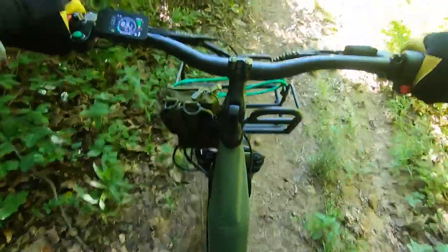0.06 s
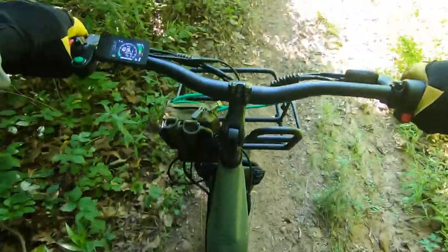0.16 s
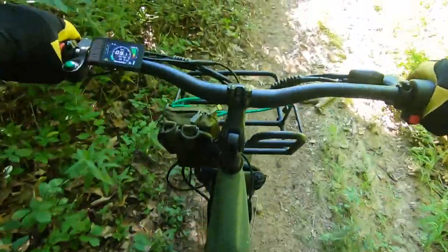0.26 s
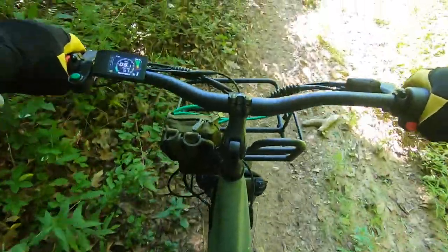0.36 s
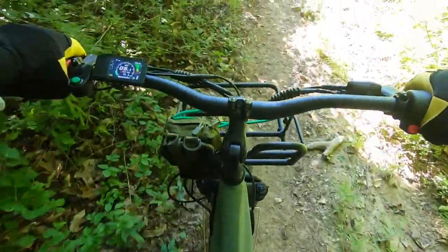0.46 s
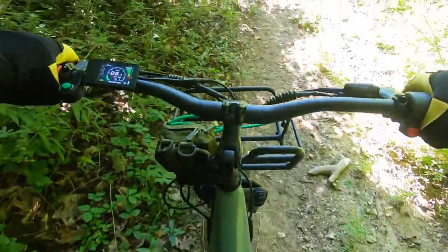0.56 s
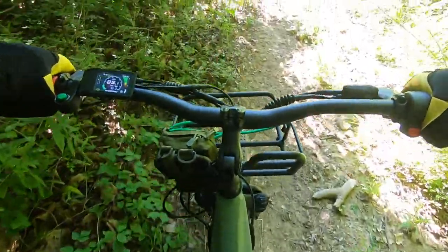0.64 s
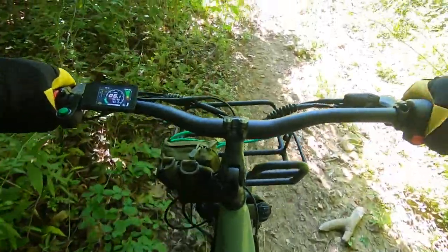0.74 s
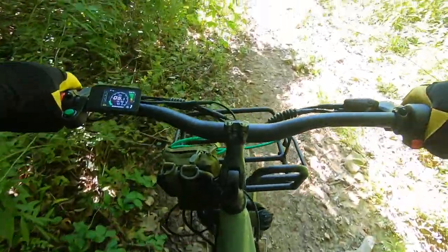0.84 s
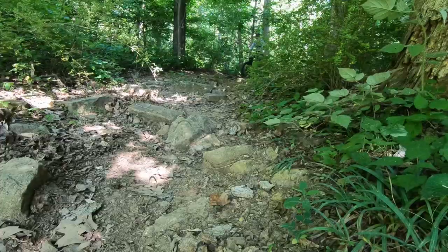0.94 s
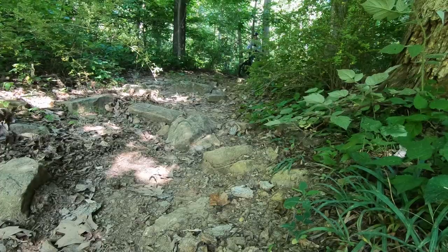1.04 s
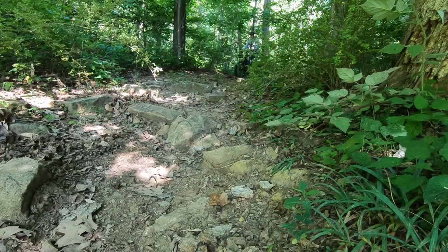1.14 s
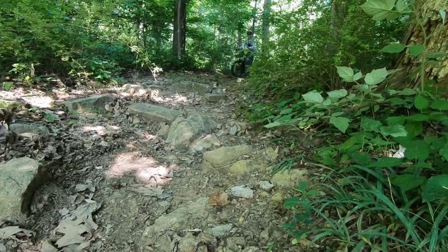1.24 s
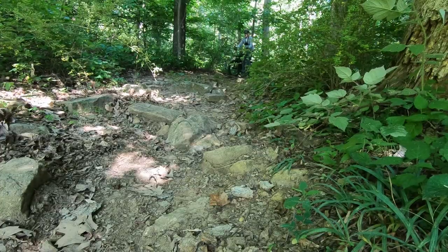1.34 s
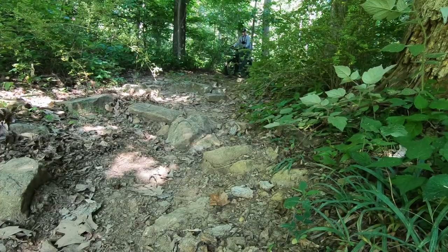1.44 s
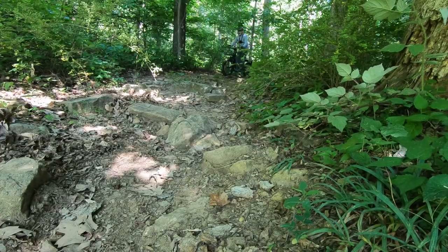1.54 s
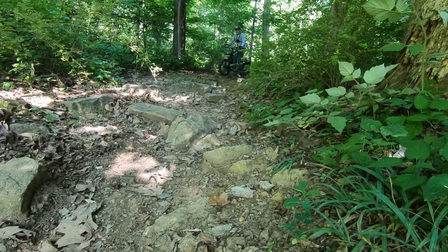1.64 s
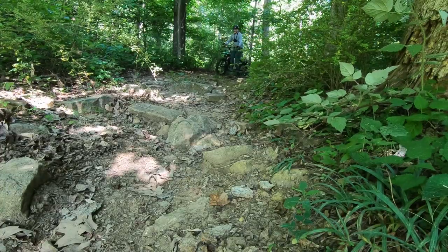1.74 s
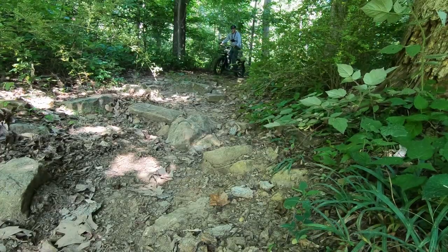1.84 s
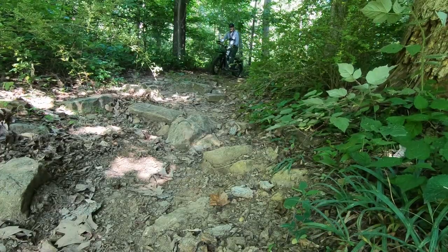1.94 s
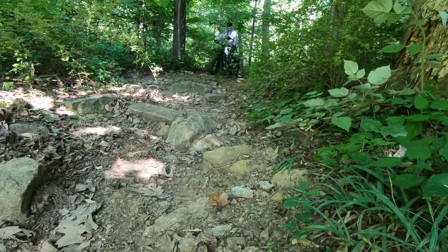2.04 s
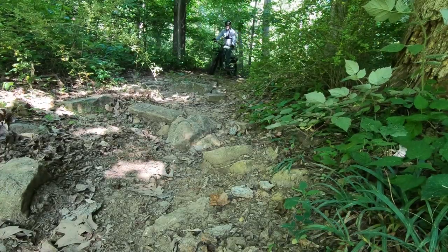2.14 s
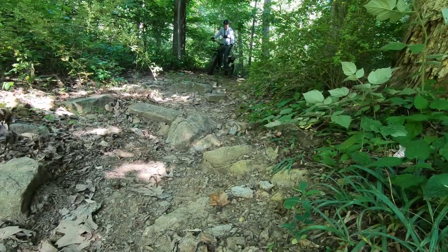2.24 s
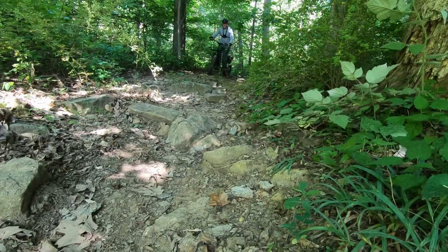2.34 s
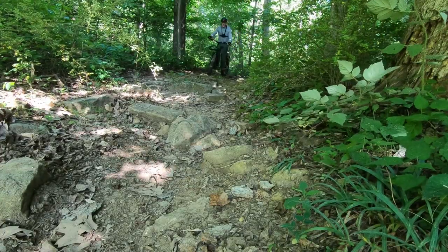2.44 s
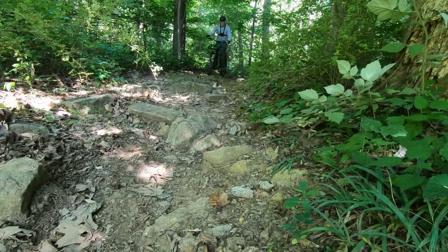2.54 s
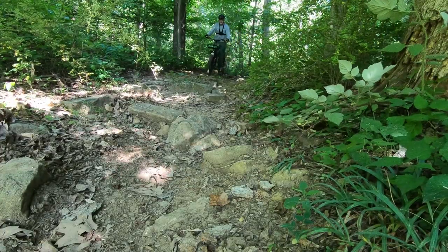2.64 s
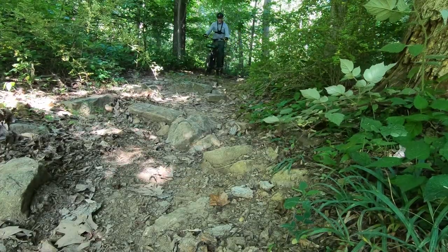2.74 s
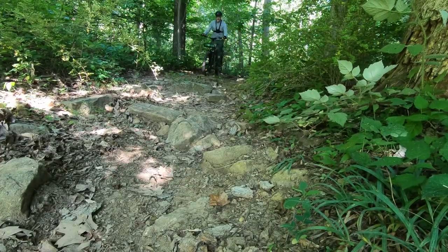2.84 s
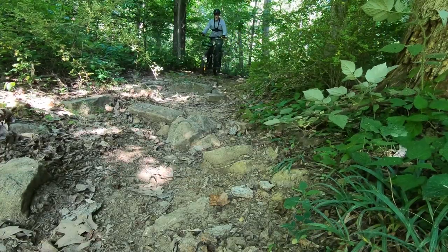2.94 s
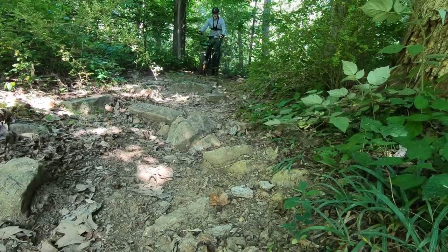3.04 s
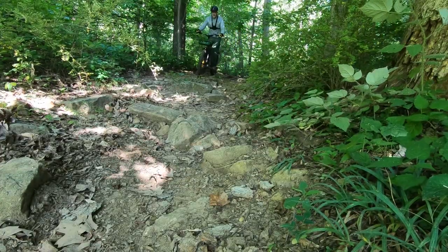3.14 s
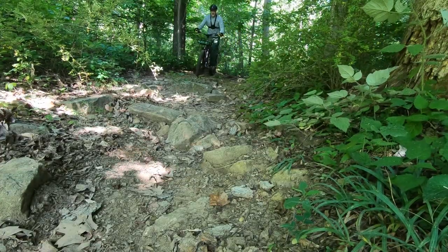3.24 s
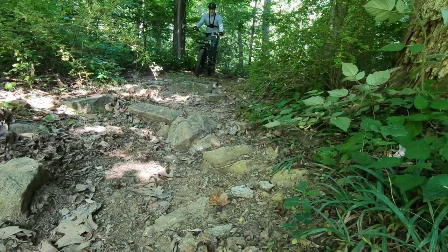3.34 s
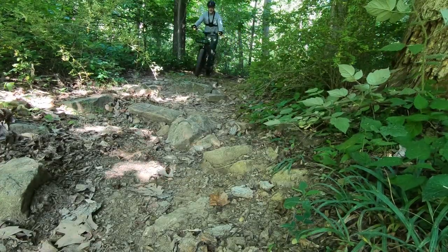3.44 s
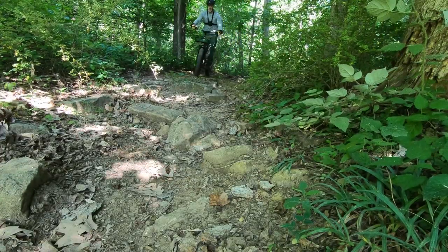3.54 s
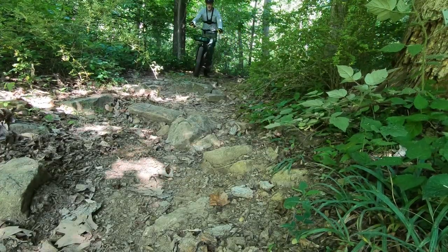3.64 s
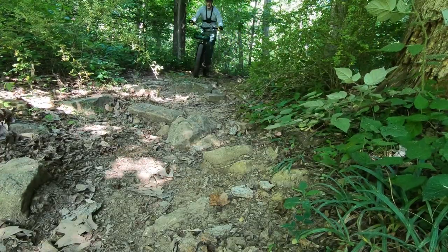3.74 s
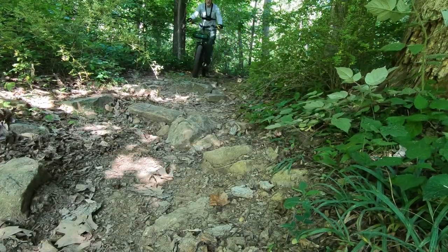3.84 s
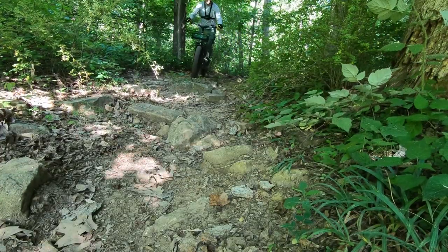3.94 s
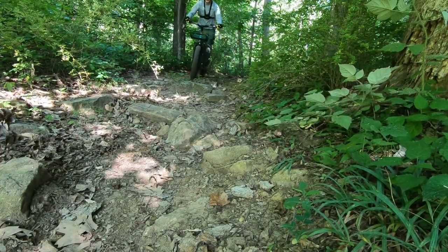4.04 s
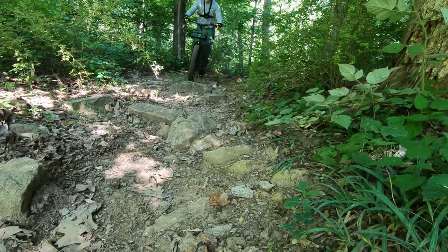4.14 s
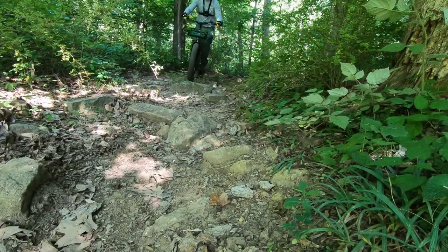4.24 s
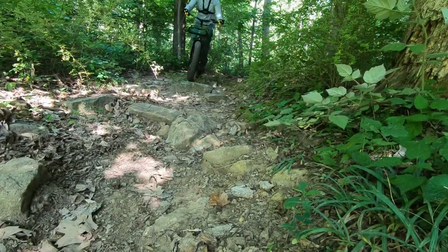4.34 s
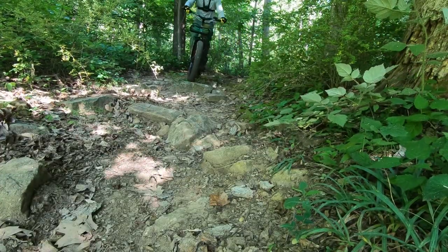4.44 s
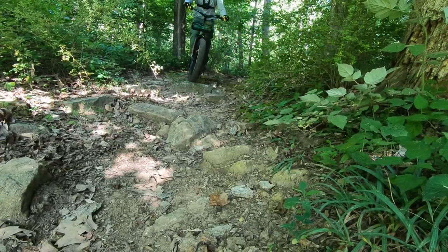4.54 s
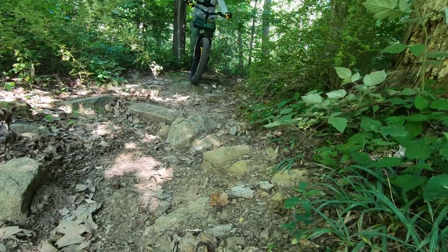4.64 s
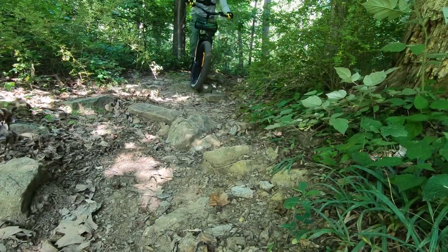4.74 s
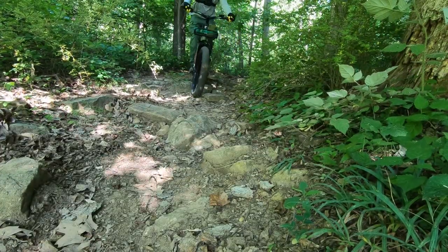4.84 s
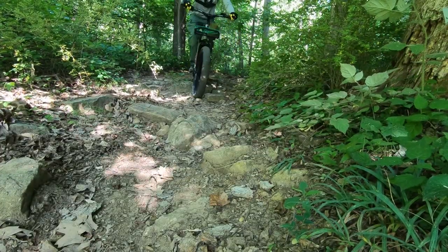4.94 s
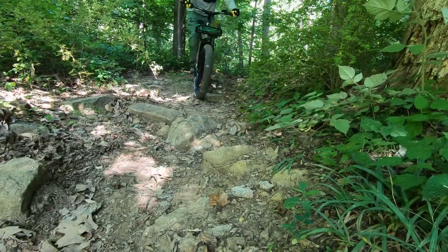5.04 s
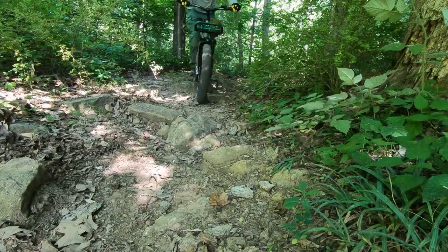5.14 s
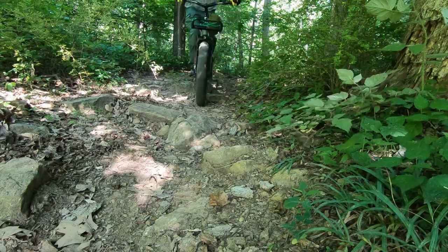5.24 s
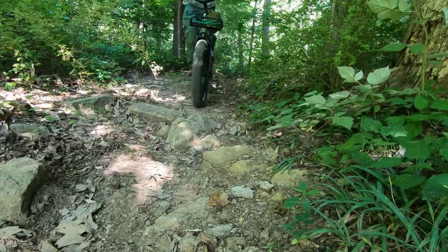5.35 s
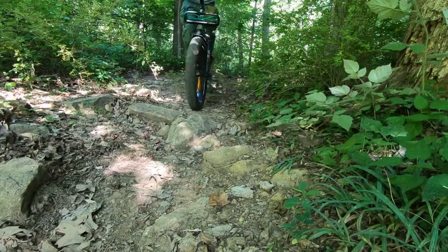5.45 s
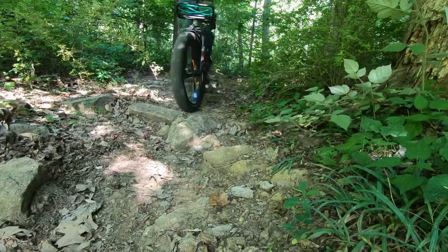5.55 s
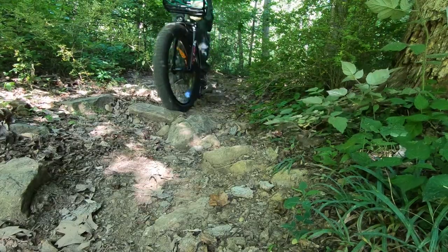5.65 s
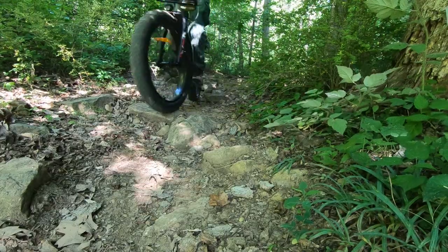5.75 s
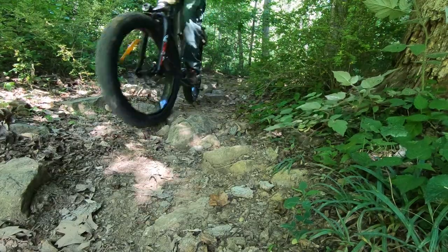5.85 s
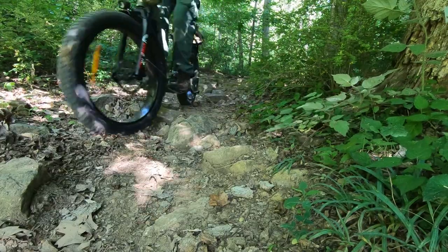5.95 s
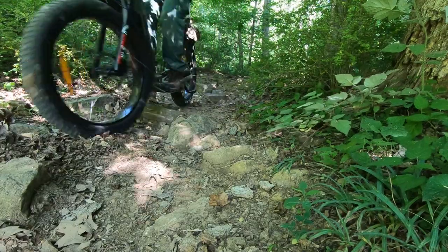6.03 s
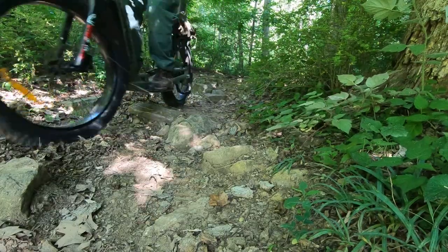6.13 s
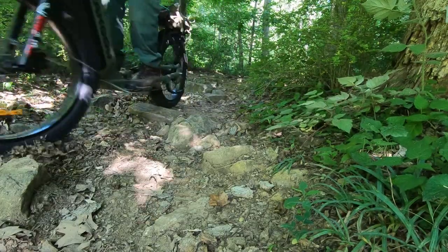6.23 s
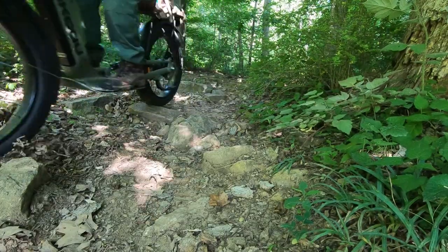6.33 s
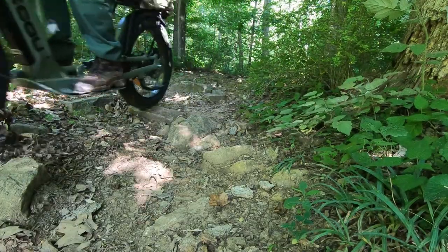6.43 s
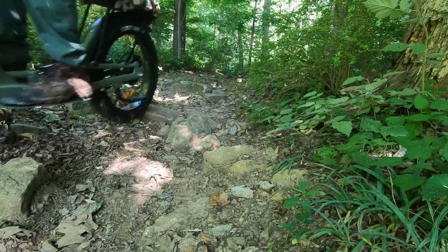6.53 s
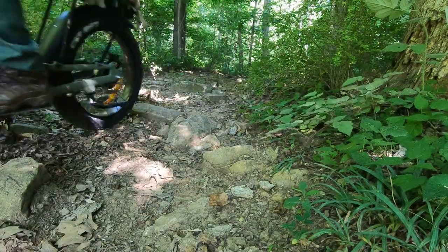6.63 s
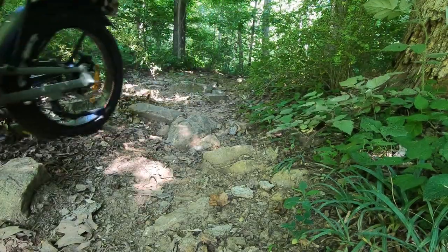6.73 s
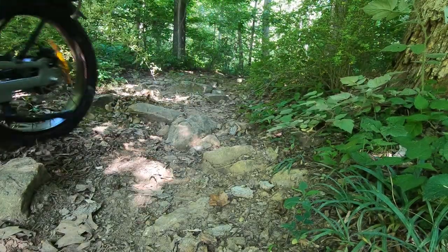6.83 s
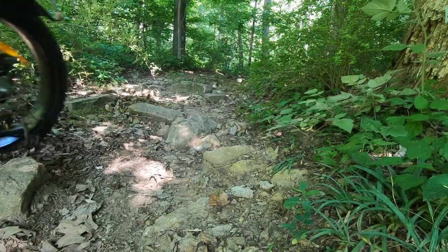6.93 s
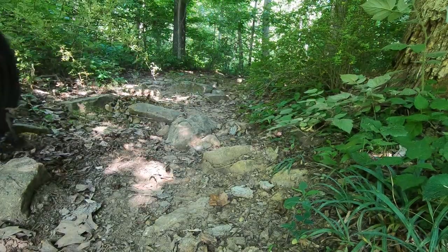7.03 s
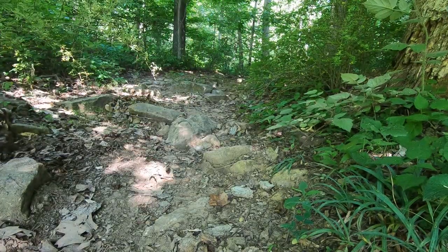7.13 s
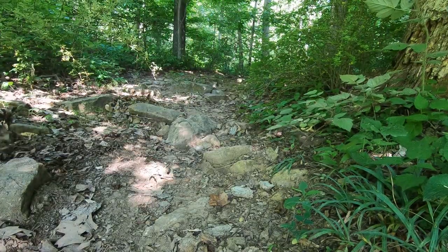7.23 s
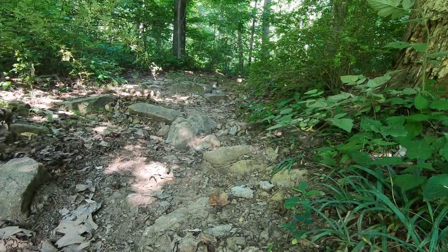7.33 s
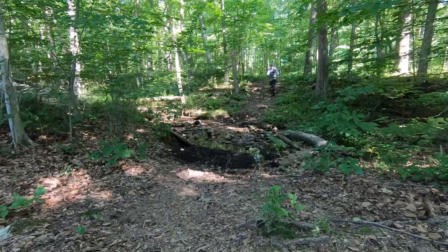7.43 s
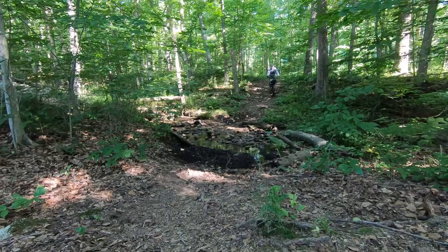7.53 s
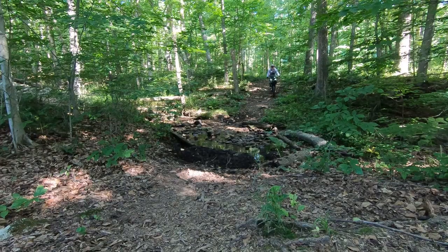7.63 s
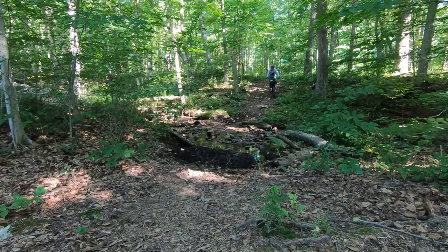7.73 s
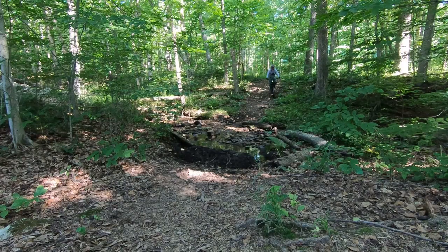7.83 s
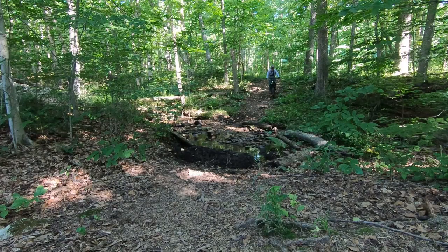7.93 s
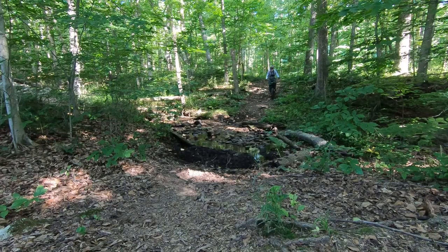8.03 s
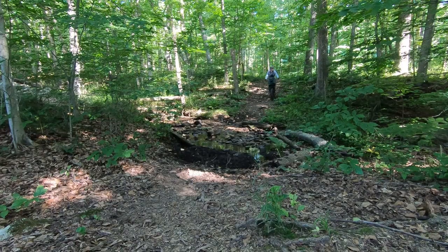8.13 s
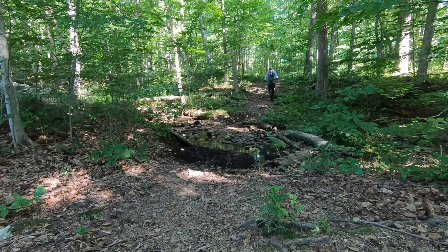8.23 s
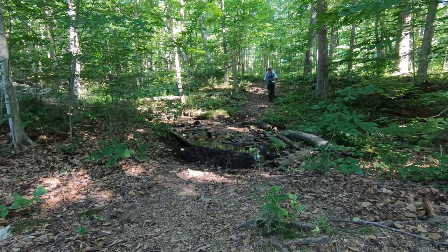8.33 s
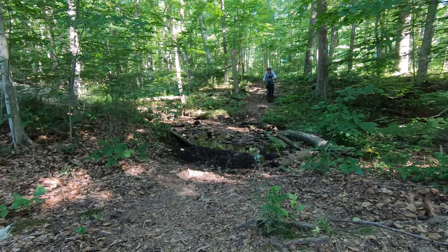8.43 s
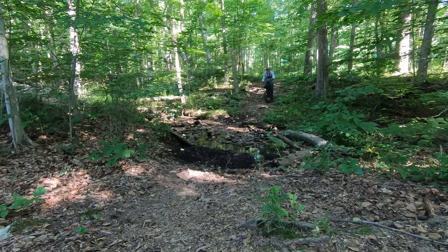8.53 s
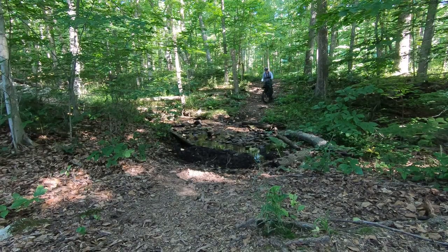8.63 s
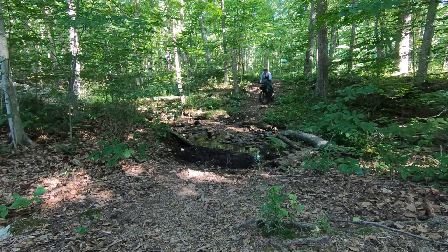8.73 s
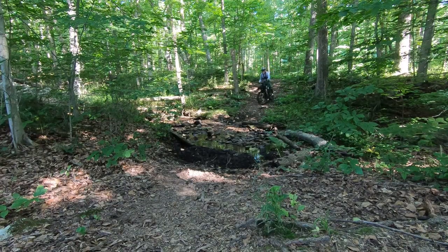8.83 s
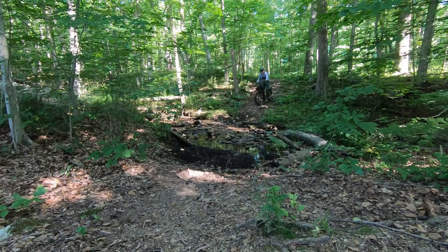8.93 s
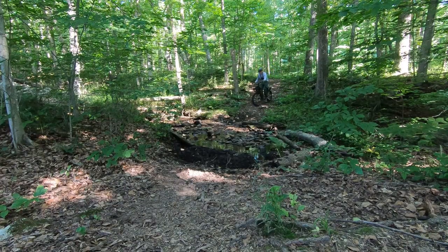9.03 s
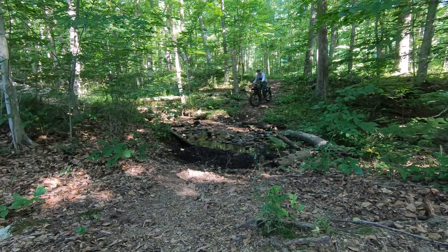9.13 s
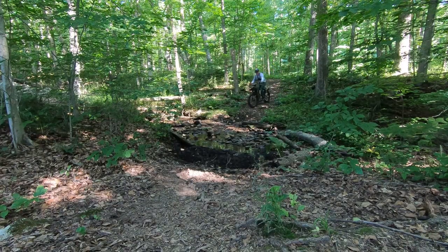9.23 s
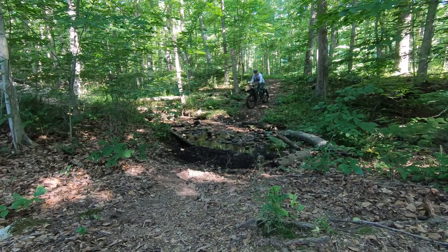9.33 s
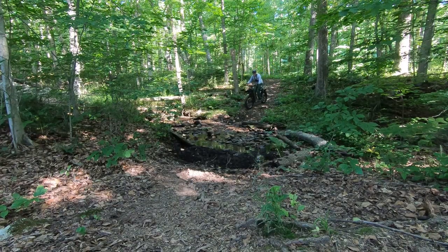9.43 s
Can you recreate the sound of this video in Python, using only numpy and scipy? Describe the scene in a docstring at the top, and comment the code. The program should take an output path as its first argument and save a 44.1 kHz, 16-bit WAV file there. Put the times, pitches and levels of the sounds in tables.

```python
"""A fat-tyred electric scooter on a woodland trail, heard from three places in turn.
First on board: frame and gear rattle as dense random contacts, with wind on the microphone ports.
Then from the ground: it nears over rocks, sticks and leaves, made of ringing grains, knocks and ticks.
Last from far off: smeared stones and rustles in the quiet wood, which is coloured noise."""
import sys
import numpy as np
from scipy import signal
from scipy.fft import rfft, irfft
from scipy.io import wavfile

SR = 44100
rng = np.random.default_rng(int(sys.argv[2]) if len(sys.argv) > 2 else 0)


def inscribe(sig):
    """Save sig as 16-bit PCM at rate SR to the path in sys.argv[1].

    A 1-D sig is mono; a 2-D sig holds one channel per row.
    Samples are clipped to [-1, 1] before scaling.
    """
    pcm = np.round(np.clip(np.atleast_2d(sig).T, -1, 1) * 32767)
    wavfile.write(sys.argv[1], SR, pcm.astype(np.int16))


N = 418068
TIME = np.arange(N) / SR   # seconds
HZ = np.maximum(np.arange(N // 2 + 1) * SR / N, 1)   # frequencies of the spectrum

ON_BOARD_END_S, PASS_END_S = .915, 7.457   # the listening place changes at these moments

# How the two microphone ports hear the wheels and knocks. Each row: frequency in Hz, likeness of the
# ports from 0 to 1, lead of the left port in radians, left level over right in dB.
PORTS_NEAR = [(308, 0.98, 0.046, -3.5), (570, 0.53, 0.81, -4.5), (1000, 0.49, 1.67, 2.5),
              (1960, 0.4, 0.084, 3.5), (3900, 0.5, 0.65, 0), (5770, 0.75, 1.3, 1), (9000, 0.57, 2.7, -0.5)]


def from_db(db):
    """Turn decibels into a plain factor."""
    return 10 ** (np.asarray(db) / 20)


def rms_one(x):
    """Scale to an average strength (rms) of 1."""
    return x / np.sqrt(np.mean(x ** 2) + 1e-20)


def in_time(rows):
    """Draw straight lines between rows that start with a time."""
    s, *columns = np.transpose(rows)
    return [np.interp(TIME, s, c) for c in columns]


def in_hz(rows):
    """Draw lines between rows that start with a frequency, on a log pitch scale."""
    hz, *columns = np.transpose(rows)
    return [np.interp(np.log(HZ), np.log(hz), c) for c in columns]


def colour(x, spectrum):
    """Weight the frequencies by a table; rms 1."""
    return rms_one(irfft(rfft(x) * from_db(in_hz(spectrum)[0]), N))


def drift(rate_hz):
    """Slow random wandering around 0, with a spread of 1."""
    return rms_one(irfft(rfft(rng.standard_normal(N)) / (1 + (HZ / rate_hz) ** 2), N))


def low_pass(x, order, hz):
    """Keep what lies below hz."""
    return signal.sosfilt(signal.butter(order, hz, fs=SR, output="sos"), x)


def resonance(x, hz, width_hz):
    """Let a sound excite one ringing pitch; the narrower its band, the longer it rings."""
    r = np.exp(-np.pi * width_hz / SR)
    feedback = [1, -2 * r * np.cos(2 * np.pi * hz / SR), r * r]
    return signal.lfilter([1 - r * r, 0, r * r - 1], feedback, x) / 2


def burst(s, length, swell_s=0.011):
    """Loudness curve that swells from second s, then falls more and more steeply."""
    fall_power = 1.44
    out, start, fall = np.zeros(N), round(s * SR), max(length, .005)
    u = np.arange(min(N - start, int(10 * fall * SR))) / SR
    out[start:start + len(u)] = (1 - np.exp(-u / swell_s)) * np.exp(-(u / fall) ** fall_power)
    return out


def grains(per_s, uneven_db, low_hz, high_hz, cycles, clump_db):
    """Three streams of clumped random contacts of uneven size, each ringing at one of twelve pitches."""
    sizes = from_db(uneven_db * np.minimum(rng.exponential(1, (3, N)), 4))
    sizes = sizes * rng.choice([-1, 1], (3, N))
    chance = per_s * from_db(clump_db * drift(25)) / SR
    clicks = sizes * (rng.random((3, N)) < chance)
    dealt = rng.integers(0, 12, N)   # which pitch each moment belongs to
    out = np.zeros((3, N))
    for k, hz in enumerate(np.geomspace(low_hz, high_hz, 12)):
        out += resonance(clicks * (dealt == k) + 1e-18, hz, hz / cycles) / hz
    return rms_one(out)


def ports(three, table):
    """Both ports hear the first signal, one with a lead; each adds scattered sound of its own."""
    alike, lead, balance_db = in_hz(table)
    alike, side, sound = np.clip(alike, 0, 1), np.array([[.5], [-.5]]), rfft(three)
    shared = np.sqrt(alike) * np.exp(1j * side * lead) * sound[0]
    own = np.sqrt(1 - alike) * sound[1:]
    return irfft((shared + own) * from_db(side * balance_db), N)


def scattered(x):
    """Trees smear a sound into a short dying cloud of echoes; its strength stays."""
    cloud = rng.standard_normal(N) * np.exp(-TIME / .03)
    return rms_one(irfft(rfft(x) * rfft(cloud), N)) * np.std(x)


def top_octave_dulled(x):
    """Soften the treble above 8 kHz, except in the bright stretch from 5.85 s to the end of the pass."""
    bright_from_s, kept_share, dull_cut_hz = 5.85, 0.35, 8000
    bright = np.clip((TIME - bright_from_s) / 0.3, 0, 1) * (TIME < PASS_END_S)
    bright = kept_share + (1 - kept_share) * bright
    dull = irfft(rfft(x) / (1 + (HZ / dull_cut_hz) ** 6), N)
    return bright * x + (1 - bright) * dull


def wood():
    """Coloured noise as the hush of the wood, with a low far hum, weaker and wavering at the last place."""
    # Each row: frequency in Hz, relative level in dB.
    hush_colour = [(25, -17), (65, -5.5), (107, -20.5), (144, 0), (202, 2.5), (244, -11), (318, -11.5),
                   (584, -23), (666, -18.5), (1050, -27), (1360, -19.5), (3260, -24), (4600, -28.5),
                   (6000, -20), (7610, -34), (12600, -48), (14000, -69)]
    # Each row: frequency in Hz, likeness of the ports from 0 to 1, lead of the left in radians,
    # left level over right in dB.
    wood_ports = [(312, 0.039, 3, -2.5), (660, 0.057, 8.5, -1.5), (1620, 0.37, 1.5, -1.2),
                  (4800, 0.79, 0, 1), (7700, 0.029, 23.5, 0)]
    level_db = -53.5 + .9 * drift(4)   # the hush breathes a little
    hush = colour(rng.standard_normal((3, N)), hush_colour)
    hum_loss = np.clip(0.25 + 0.34 * drift(2.0), 0, 1) * (TIME > PASS_END_S)
    return ports(from_db(level_db) * (hush - hum_loss * resonance(hush, 176, 120)), wood_ports)


def thin_tones():
    """Wavering sine tones: a brief brake squeak, motor whine, and chirps that swing up and hold."""
    # Brake disc. Each row: middle in seconds, pitch in Hz, level in dB, length in seconds.
    squeak = [(6.562, 9850, -39, 0.023), (6.557, 14300, -63, .03)]
    # Motor whine surfacing on board. Each row: middle in seconds, pitch in Hz, level in dB, length in seconds.
    whine = [(.36, 3740, -58.5, 0.33), (.68, 3800, -63, 0.19), (.8, 1650, -60, 0.2)]
    # Far bird or insect. Each row: start in seconds, peak level in dB.
    chirps = [(7.648, -68), (8.53, -69), (9.278, -69)]
    out = np.zeros(N)
    for s, hz, db, length in [*squeak, *whine]:
        swell = np.exp(-((TIME - s) / length * 2) ** 2) * from_db(4.9 * drift(17))
        out += from_db(db) * swell * np.sin(2 * np.pi * hz * TIME + 1.3 * drift(40))
    for s, db in chirps:
        u = np.clip((TIME - s) / 0.103, 0, 1)   # progress through the chirp
        pitch_hz = 7800 - 500 * np.exp(-5 * u) + 200 * drift(279)
        phase = 2 * np.pi * np.cumsum(pitch_hz) / SR
        out += from_db(db) * np.sin(np.pi * u ** .5) * np.sin(phase)
    return out


def slaps():
    """Wind slaps the ports: short slow swings of pressure, much stronger on the right."""
    # Each row: start in seconds, level in dB before the left-right balance, pitch in Hz.
    thumps = [(1.461, -18, 101), (1.481, -14.5, 74), (1.556, -26, 59.2), (1.648, -21, 32),
              (1.731, -13, 51.7), (3.353, -16.5, 43)]
    swings = np.zeros(N)
    for s, db, hz in thumps:
        swings += from_db(db) * burst(s, 0.0041) * np.sin(2 * np.pi * hz * (TIME - s))
    return swings * from_db([[-1], [6]])


def gusts():
    """Wind on the ports: lumpy low noise, mostly own in each port and stronger on the right."""
    # Each row: time in seconds, level in dB, around which the gusts wander.
    wind_level = [(0.0, -45), (0.16, -35.5), (1.18, -65), (1.2, -53), (1.33, -70), (1.45, -41),
                  (1.68, -41.5), (1.77, -24), (1.82, -50), (2.93, -73), (3.48, -43), (3.68, -69),
                  (3.85, -48.5), (3.91, -55), (3.99, -39.5), (4.5, -70)]
    shared, *own = low_pass(rng.standard_normal((3, N)), 3, 80)
    level_db = in_time(wind_level)[0] + 5.0 * drift(8.3) + np.array([[-1.2], [1.2]])
    return rms_one(0.51 * shared + np.array(own)) * from_db(level_db)


def ground_boom(thud_load):
    """Ground boom under the near wheels, much alike in both ports; it outgrows the thud and lingers."""
    boom_db, boom_power, lag_s = 14, 1.58, 0.024
    band = signal.butter(2, [45, 120], "band", fs=SR, output="sos")
    ground = signal.sosfilt(band, rng.standard_normal((3, N)))
    r = np.exp(-1 / (lag_s * SR))
    lingering = signal.lfilter([1 - r], [1, -r], thud_load)
    return from_db(boom_db) * lingering ** boom_power * rms_one(ground[0] + 0.28 * ground[1:])


def wind_and_boom(thud_load):
    """Low pressure on the ports: wind gives way to the ground boom, which stops when the pass ends."""
    near = np.clip((TIME - 4.3) / 0.18, 0, 1)
    return (1 - near) * gusts() + near * (TIME < PASS_END_S) * ground_boom(thud_load)


def ticks(load):
    """Grit and twigs: noise puffs light one band and a broad edge; smaller ones fall where stones work."""
    # Dry ticks, over at once. Each row: start in seconds, level of the band in dB, band centre in Hz.
    dry_ticks = [(.327, -36, 3500), (.455, -37, 4000), (.514, -26, 1500), (.527, -26, 1300),
                 (.598, -34, 2600), (.745, -35, 2400), (1.228, -42, 2200), (1.573, -39, 3220),
                 (1.784, -37, 3280), (2.21, -41, 2950), (2.442, -44, 6900), (3.349, -42, 1950),
                 (3.969, -36, 1800), (4.008, -42, 1820), (4.03, -39, 5750), (4.154, -30, 1500),
                 (4.19, -30, 1500), (4.663, -42, 5600), (4.9, -30, 2300), (4.95, -30, 1700),
                 (5.019, -35, 1680), (5.035, -34, 1400), (5.161, -36, 1730), (5.178, -37, 2500),
                 (5.253, -26, 3000), (5.48, -39, 2000), (5.657, -35, 6300), (5.762, -33, 6100),
                 (5.815, -26, 6100), (5.863, -32, 5000), (5.901, -30, 2100), (5.914, -24, 2150),
                 (6.121, -29, 6320), (6.157, -30, 2200), (6.217, -32, 2480), (6.249, -32, 5000),
                 (6.268, -31, 2000), (6.388, -32, 2300), (6.405, -33, 1500), (6.444, -33, 2500),
                 (6.482, -28, 1700), (6.6, -22, 6100), (6.647, -22, 6000), (6.922, -29, 2050),
                 (6.942, -29, 2500), (7.292, -31, 2600), (7.353, -23, 1400), (7.384, -18, 1800),
                 (7.412, -26, 1600), (8.462, -44, 5700), (9.133, -43, 1950), (9.375, -44, 5820),
                 (1.487, -44, 3200), (1.855, -43, 5800), (6.134, -14, 4800), (6.313, -19, 3300),
                 (7.428, -12, 1500)]
    decay_s, width_hz, edge_db, top_hz = .002, 1100, -7, 8500
    grit_per_s, grit_db = 140, -13
    out, t = np.zeros((3, N + 600)), np.arange(600) / SR
    noise = rng.standard_normal((len(dry_ticks), 3, len(t))) * np.exp(-t / decay_s)
    for puff, (s, db, hz) in zip(noise, dry_ticks):
        band = resonance(puff, hz, width_hz)
        edge = resonance(puff * np.exp(-t / decay_s), 4700, 6860)
        tick = band / np.abs(band[0]).max() + from_db(edge_db) * edge / np.abs(edge[0]).max()
        out[:, round(s * SR):][:, :len(t)] += from_db(db) * tick
    born = (rng.random(N) < grit_per_s / SR) * from_db(3 * np.minimum(rng.exponential(1, N), 2.5))
    grit = signal.lfilter([1], [1, -.96], born) * rng.standard_normal((3, N))
    out = out[:, :N] + from_db(grit_db) * load * rms_one(resonance(grit, 1700, 2700))
    return low_pass(out, 3, top_hz)


def knock(hz, detune, phases, noise):
    """A blow gives a bright crack and nine scattered pitches that die quickly; copies differ in phase."""
    t = np.arange(noise.shape[-1]) / SR
    # high snaps scatter their pitches less and crack louder against the ring
    spread, crack_db = (.36, -34) if hz < 5000 else (.1, -8)
    pitches = hz * np.exp(spread * (detune - detune.mean()))
    starts = phases * [[[0]], [[1]], [[1]]]   # the first copy starts all its pitches together
    ring = np.sin(2 * np.pi * (pitches * t + starts)).sum(axis=1)
    ring = ring * from_db(-60 * t / (0.029 + 12 / hz)) * np.minimum(t / 0.0011, 1)
    fade = np.exp(-t / 0.0044) + from_db(-22) * np.exp(-t / .01)   # the second part is grit settling
    crack = resonance(resonance(noise * fade, 1800, 2900), 5800, 4440)
    return ring / np.abs(ring[0]).max() + from_db(crack_db) * crack


def knocks(stones_load):
    """Ringing knocks and snaps, a deck that noise bursts set ringing after drops, and ticks."""
    # Each row: start in seconds, level of the ring in dB, ring pitch in Hz.
    blows = [(0.182, -30, 1580), (0.288, -24, 900), (1.559, -41, 6000), (1.615, -40, 5970),
             (1.74, -35, 6170), (4.072, -40.5, 447), (4.151, -23, 510), (4.217, -28, 1650),
             (4.688, -39, 1610), (4.828, -24.5, 533), (4.915, -8.5, 734), (5.305, -30, 502),
             (5.33, -26, 756), (5.588, -31.5, 515), (5.63, -29.5, 2300), (6.02, -15.5, 6100),
             (6.068, -34, 1780), (6.454, -34, 2100), (6.616, -19, 5600), (6.63, -9, 6230),
             (6.647, -13, 1000), (6.664, -20.5, 840), (6.728, -18.5, 5900), (6.749, -23.5, 5600),
             (7.043, -24.5, 2700), (7.053, -31, 2990), (7.213, -21.5, 1175), (7.324, -11, 1320),
             (8.82, -35, 1224)]
    # The deck after a drop. Each row: start in seconds, pitch in Hz, level of the driving noise in dB.
    deck = [(3.535, 384, -26.5), (4.135, 353, -9), (4.923, 337, -10.5)]
    out = np.zeros((3, N + 2000))
    detune = rng.uniform(-0.76, 1, (len(blows), 9, 1))
    phases = rng.random((len(blows), 3, 9, 1))
    noise = rng.standard_normal((len(blows), 3, 2000))
    for k, (s, db, hz) in enumerate(blows):
        out[:, round(s * SR):][:, :2000] += from_db(db) * knock(hz, detune[k], phases[k], noise[k])
    for s, hz, db in deck:
        drive = burst(s, 0.087) * rng.standard_normal((3, N))
        out[:, :N] += from_db(db) * resonance(drive + 1e-18, hz, 29)
    all_ticks = ticks(stones_load * (TIME < PASS_END_S))   # the unlisted grit stops with the pass
    return ports(top_octave_dulled(out[:, :N] + all_ticks), PORTS_NEAR)


def loads():
    """How hard stones, tyre, sticks and leaves are worked: steady rolling plus crunches and rustles."""
    # Steady rolling between the crunches. Each row: time in seconds, level in dB before the mix below.
    trail = [(3.7, -68), (4.19, -55.5), (4.31, -74), (4.55, -66), (4.96, -52.5), (5.52, -63), (5.99, -47.5),
             (7.28, -54), (7.46, -61)]
    # Offsets for stones, tyre thud, sticks and dry leaves in steady rolling, in dB.
    trail_mix_db = [6, 3, 0.5, -0.5]
    # Tyre on the ground. Each row: start in seconds, thud level in dB, stones level in dB, length in seconds.
    crunches = [(2.85, -46.5, -46, 0.06), (3.065, -48.5, -52.5, 0.077), (3.492, -38.5, -65, 0.071),
                (3.65, -44.5, -70, 0.029), (3.909, -41.5, -47, 0.038), (4.129, -34.5, -32.5, 0.087),
                (4.607, -35, -61, 0.029), (4.817, -31, -35, 0.063), (4.873, -53, -27, 0.046),
                (4.914, -10, -42, 0.0053), (5.034, -28.5, -35, 0.014), (5.092, -30.5, -37, 0.011),
                (5.155, -46, -44.5, 0.14), (5.316, -49, -37, 0.033), (5.582, -38.5, -37.5, 0.1),
                (5.686, -32, -53, 0.015), (5.762, -35, -41, 0.027), (5.917, -37, -44, 0.065),
                (5.965, -32, -23, 0.029), (6.125, -36.5, -31, 0.024), (6.286, -33, -38.5, 0.026),
                (6.445, -57, -32, 0.03), (6.583, -27.5, -26.5, 0.066), (6.643, -34, -25.5, 0.081),
                (6.72, -28.5, -23.5, 0.044), (6.774, -30, -38.5, 0.035), (6.916, -45.5, -30, 0.042),
                (7.034, -36.5, -33, 0.06), (7.171, -50.5, -45.5, 0.45), (7.192, -33, -47, 0.018),
                (7.309, -21.5, -31, 0.042), (7.348, -22.5, -22.5, 0.052), (7.417, -60, -33, 0.048),
                (7.943, -48, -51, 0.018), (8.49, -40.5, -52, 0.017), (8.811, -55, -51, 0.14)]
    # Dry leaves alone. Each row: start in seconds, level in dB, length in seconds.
    rustles = [(1.132, -54, 0.4), (2.14, -68, 0.067), (3.093, -58.5, 0.19), (4.002, -48.5, 0.17),
               (4.757, -44.5, 0.15), (5.614, -43.5, 0.062), (5.726, -47, 0.05), (5.904, -44.5, 0.1),
               (6.197, -50, 0.058), (6.61, -52, 0.15), (8.412, -58, 0.2), (8.777, -61.5, 0.49)]
    # Stones under the far tyres. Each row: time in seconds, level in dB.
    far_roll = [(7.46, -50.5), (8.6, -56.5), (8.85, -50), (9.48, -52.5)]
    sticks_offset_db, thud_share, leaves_offset_db = -5, 0.88, -15.5
    far = TIME >= PASS_END_S
    fade_in = np.clip((TIME - trail[0][0]) / 0.29, 0, 1)
    load = from_db(in_time(trail)[0] + np.c_[trail_mix_db]) * fade_in * ~far
    for s, thud_db, stones_db, length in crunches:
        # sticks lie between thud and stones
        sticks_db = sticks_offset_db + thud_share * thud_db + (1 - thud_share) * stones_db
        leaves_db = stones_db + leaves_offset_db
        heard = far == (s >= PASS_END_S)   # a crunch ends when the listening place changes
        load += from_db(np.c_[[stones_db, thud_db, sticks_db, leaves_db]]) * (burst(s, length) * heard)
    load[0] += from_db(in_time(far_roll)[0]) * far
    for s, db, length in rustles:
        load[3] += from_db(db) * burst(s, length, swell_s=0.019)
    return load


def rolling(load):
    """Stones crunch, the soft tyre booms in its air cavity, sticks and soil knock dully, leaves crackle."""
    # Each row: frequency in Hz, relative level in dB.
    stones_colour = [(500, -13), (900, -4.5), (1500, -0.5), (2400, -1), (3500, -6.5), (5000, -40),
                     (8000, -34)]
    # Each row: frequency in Hz, relative level in dB.
    leaves_colour = [(1500, -8), (3500, -25), (5000, -22), (6200, -11), (7200, -16.5), (9000, -21.5),
                     (12000, -26), (15500, -30)]
    stones = from_db(-8.5) * colour(grains(650, 4.0, 700, 4200, 5.5, 6), stones_colour)
    stones = np.where(TIME < PASS_END_S, stones, scattered(stones))
    thud = low_pass(grains(250, 2.14, 156.0, 218.3, 8.2, 1.7), 2, 400)
    sticks = low_pass(grains(300, 3.64, 307.0, 791, 7.3, 3.2), 2, 1000)
    leaves = colour(grains(8000, 1.24, 3020, 11000, 4.0, 3), leaves_colour)
    ground = load[0] * stones + load[1] * thud + load[2] * sticks
    return ports(ground + top_octave_dulled(load[3] * leaves), PORTS_NEAR)


def on_board():
    """Dense contacts of tyre and gear; sparser jolts ring the frame's own pitches, each in its own fits."""
    # Each row: time in seconds, rattle level in dB.
    ride = [(0.0, -38.5), (0.91, -40.5)]
    # Each row: frequency in Hz, relative level in dB.
    ride_colour = [(71, -58), (120, -10.5), (248, -17.5), (323, -6), (428, -12), (981, -6.5), (1150, -12),
                   (3800, -13.5), (4370, -16.5), (8690, -11.5), (15000, -37)]
    # Each row: frame pitch in Hz, width in Hz, relative level in dB.
    frame_modes = [(315.6, 10, 8), (944, 130, -10.5)]
    # Each row: frequency in Hz, likeness of the ports from 0 to 1, lead of the left in radians,
    # left level over right in dB.
    ride_ports = [(100, 0.99, 0.13, -1), (302, 1, 0.11, 0.5), (670, 0.95, -0.52, -2.5),
                  (1060, 0.58, -1.7, -6), (4040, 0.74, 0.48, -1.5), (7100, 0, -1.2, -1.5)]
    contacts = colour(grains(5000, 1.5, 187, 11500, 2.27, 2.4), ride_colour)
    jolts = grains(2000, 3.6, 380, 5000, 0.86, 3.6)
    jolts = rms_one(np.diff(jolts, prepend=0))   # differences favour the treble
    frame = np.zeros((3, N))
    for hz, width, db in frame_modes:
        frame += from_db(db + 18.5) * resonance(jolts * from_db(4 * drift(12)), hz, width)
    return ports(from_db(in_time(ride)[0]) * rms_one(contacts + frame), ride_ports)


def scene():
    """Switch from on board to the trail and wood; add wind, knocks and tones."""
    aboard = np.clip((ON_BOARD_END_S - TIME) / 0.00065, 0, 1)
    load = loads()
    outside = rolling(load) + wood()
    places = aboard * on_board() + (1 - aboard) * outside
    return places + wind_and_boom(load[1]) + slaps() + knocks(load[0]) + thin_tones()


def record(dry):
    """Cut the rumble below 18 Hz and the top above 15650 Hz."""
    dry = signal.sosfilt(signal.butter(2, 18, "high", fs=SR, output="sos"), dry)
    return signal.sosfilt(signal.ellip(10, .5, 70, 15650, fs=SR, output="sos"), dry)


dry = scene()
out = record(dry)
inscribe(out)
```